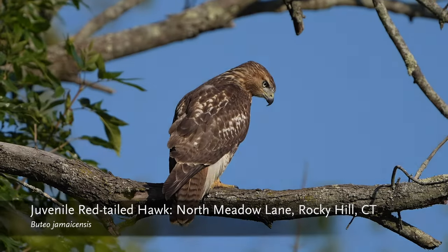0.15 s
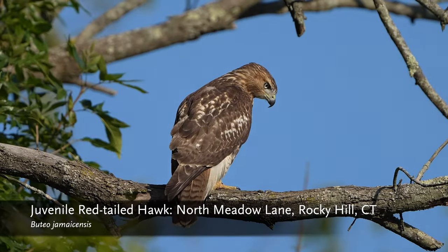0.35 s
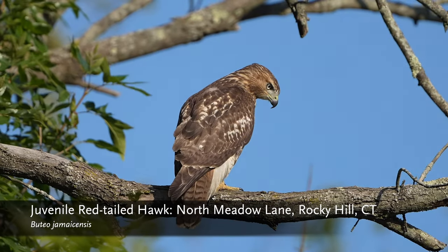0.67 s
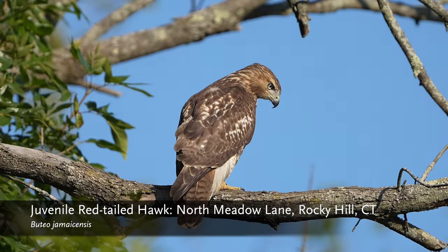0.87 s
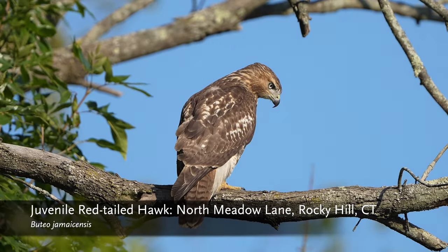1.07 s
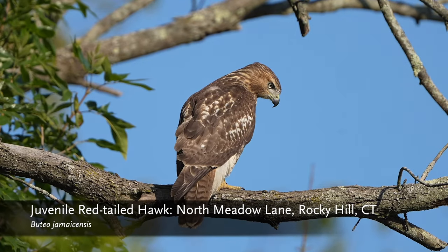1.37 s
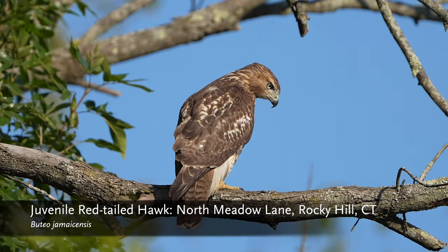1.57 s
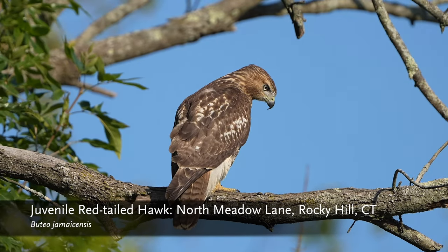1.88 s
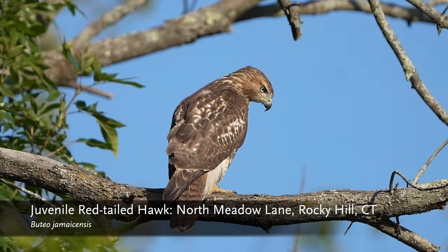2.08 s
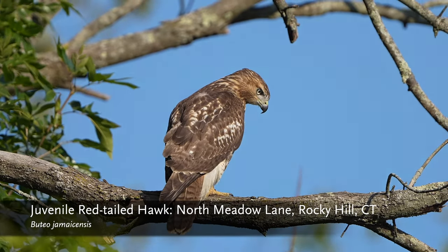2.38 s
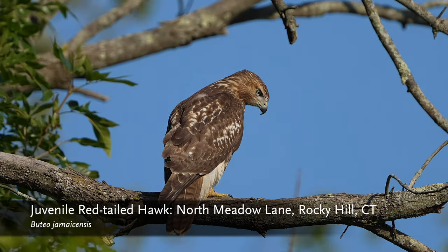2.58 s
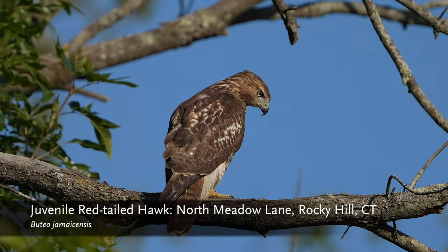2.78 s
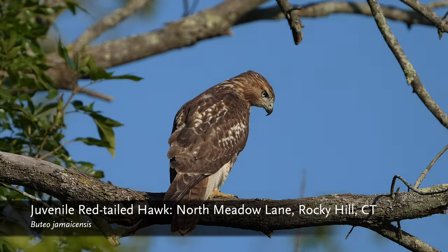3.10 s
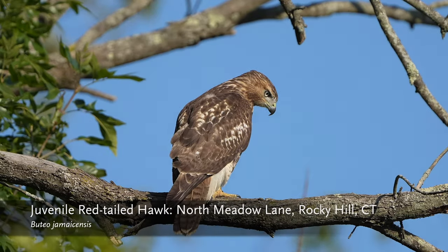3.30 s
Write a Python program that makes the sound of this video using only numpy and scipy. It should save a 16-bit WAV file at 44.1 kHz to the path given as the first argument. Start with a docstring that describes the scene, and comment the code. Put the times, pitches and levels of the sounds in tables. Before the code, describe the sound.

A high cricket chorus fades in and keeps swelling and ebbing outdoors over a distant road's hiss and drone. A katydid buzzes until 0.9 seconds and again from 2, while another ticks between 0.5 and 1.8. A far bird whistles faintly around 0.7. Small close clicks come near 1.1, 1.4 and 3.3 seconds. Wind rumbles on the microphone, strongest around 0.4, then easing.

```python
"""A meadow edge on a summer day, fading in. A chorus of crickets swells and ebbs over a fainter, lower one;
each wing stroke is a short tone that sags in pitch. One katydid buzzes and another ticks, both as bands
of noise. A far bird whistles, a few small clicks sound close by, a distant road hisses and drones, and
gusts of wind rumble on a stereo microphone."""
import sys
import numpy as np
from scipy import signal
from scipy.fft import rfft, irfft
from scipy.io import wavfile
from scipy.ndimage import uniform_filter1d

SR = 44100
rng = np.random.default_rng(int(sys.argv[2]) if len(sys.argv) > 2 else 0)


def to_wav(s):
    """Save 16-bit WAV."""
    ch = np.atleast_2d(s).T  # columns
    pcm = np.round(np.clip(ch, -1, 1) * 32767)  # PCM
    wavfile.write(sys.argv[1], SR, pcm.astype(np.int16))


N = 152145
TIME, FREQS = np.arange(N) / SR, np.fft.rfftfreq(N, 1 / SR)


def undb(db):
    """Amplitude ratio of a level in decibels."""
    return 10 ** (np.asarray(db) / 20)


def curve(table):
    """Linear interpolation of a table over time."""
    return np.interp(TIME, *np.array(table).T)


def by_hz(table, col):
    """Interpolation of one column over log frequency."""
    rows = np.array(table)
    return np.interp(np.log(FREQS + 1), np.log(rows[:, 0]), rows[:, col])


def unit(x):
    """Normalisation to unit RMS."""
    return x / np.sqrt(np.mean(x ** 2))


def pan(db):
    """Level difference: gains that put the left channel db above the right."""
    return undb(np.array([[.5], [-.5]]) * db)


def wander(rate_hz):
    """Random modulation: sample-and-hold noise, smoothed twice."""
    hold = int(SR / rate_hz)
    held = rng.standard_normal(400)[np.arange(N) // hold % 400]
    return 1.5 * uniform_filter1d(uniform_filter1d(held, hold), hold)


# Likeness of the two channels: (frequency [Hz], coherence [0-1], phase lead of the right [rad])
COHERENCE = [(30, 0.93, 0.93), (70, 0.9, -.5), (144, 0.84, -0.5), (298, 0.6, -0.55), (590, 0.24, -0.26),
             (1080, 0.87, -0.55), (1890, 0.1, 0.37), (3530, 0.85, -2.08), (5700, 0.85, -1.39),
             (9100, 0.86, -1.4), (13000, 0.54, -2.1)]
def stereo(left, unrelated):
    """Partial coherence: the right channel mixes the phase-shifted left with an unrelated signal."""
    coherence = np.clip(by_hz(COHERENCE, 1), 0, 1)
    shared = coherence * np.exp(1j * by_hz(COHERENCE, 2)) * rfft(left)
    right = irfft(shared + np.sqrt(1 - coherence ** 2) * rfft(unrelated), N)
    return np.array([left, right])


def filtered_noise(gain):
    """Spectral shaping: stereo white noise weighted by a gain at each frequency."""
    white = stereo(*rng.standard_normal((2, N)))
    return unit(irfft(rfft(white) * gain, N))


def hiss(spectrum):
    """Band-limited noise with a tabulated spectrum."""
    in_band = (FREQS > spectrum[0][0]) * (FREQS < 1.03 * spectrum[-1][0])
    return filtered_noise(undb(by_hz(spectrum, 1)) * in_band)


def hum(peaks):
    """Resonance: noise confined to narrow Lorentzian peaks is heard as blurred notes."""
    return filtered_noise(sum(undb(db) / (1 + (2 * (FREQS - hz) / width) ** 2) for hz, width, db in peaks))


# Road hiss with leaves, and traffic roar: (frequency [Hz], spectral level [dB])
HISS_SPECTRUM = [(450, -30), (620, -10.5), (800, -4.5), (1100, -1), (1350, -5.5), (1800, -10), (2500, -7.5),
                 (3400, -11.5), (4500, -9.5), (5500, -8), (7300, -13), (8700, -13), (10000, -12),
                 (14000, -8.5), (16000, -39)]
ROAR_SPECTRUM = [(150, -6), (220, -4), (300, -1.5), (400, -9), (520, -9), (700, -10), (850, -37)]
# Notes of tyres and motor: (frequency [Hz], bandwidth [Hz], level [dB])
TYRE_PEAKS = [(1064, 12, -4), (1172, 9, 0)]
MOTOR_PEAKS = [(48.9, 6.3, 0), (100.6, 9.8, -0.5), (154.3, 4.9, -12.5), (187.7, 12, -15.5),
               (253.4, 9.4, -16.5), (301, 7.3, -20.5)]
# Envelopes of the road's four sounds: (time [s], level [dB])
WHINE_LEVEL = [(0, -100), (.4, -68), (1.4, -68), (1.55, -59), (1.75, -63), (1.95, -57), (2.15, -59),
               (2.35, -67), (2.6, -64), (3.45, -68)]
HISS_LEVEL = [(0, -94), (.11, -82.5), (.21, -66), (.3, -49.5), (.4, -43.5), (.58, -45.5), (1.3, -45),
              (2.03, -46), (2.82, -45), (3.12, -46), (3.45, -49)]
ROAR_LEVEL = [(0, -101), (.13, -86), (.26, -63), (.37, -51), (.5, -58), (1.2, -52), (1.6, -54.5),
              (2.15, -51), (2.6, -56), (3.0, -57), (3.25, -63), (3.45, -60)]
MOTOR_LEVEL = [(0, -76), (.12, -51), (.3, -33.5), (.43, -34), (.7, -35), (1.09, -39), (1.6, -38),
               (2.39, -36), (2.9, -45), (3.3, -54), (3.45, -52)]
def road():
    """Incoherent sources add: a thin whine, hiss with singing tyres, a low roar and a motor's drone."""
    whine_hz = 1068 + 3 * wander(3.6)
    whine = np.sin(2 * np.pi * np.cumsum(whine_hz) / SR) * undb(curve(WHINE_LEVEL))
    tyres = hiss(HISS_SPECTRUM) + undb(-14 + wander(4.6)) * hum(TYRE_PEAKS)
    roar = hiss(ROAR_SPECTRUM) * undb(curve(ROAR_LEVEL) + 2 * wander(14))
    tyres *= undb(curve(HISS_LEVEL) + wander(9)) * pan(1.5)
    motor = hum(MOTOR_PEAKS) * undb(curve(MOTOR_LEVEL))
    return whine + tyres + roar + motor


# Wind rumble, and the flutter on the strongest gusts: (frequency [Hz], spectral level [dB])
RUMBLE_SPECTRUM = [(20, -1.5), (30, -8), (43, 2), (59, -2), (80, -3), (120, -7), (160, -27.5), (217, -18.5),
                   (300, -37.5), (400, -50)]
FLUTTER_SPECTRUM = [(85, -33), (115, 4), (150, 0.5), (190, -7.5), (260, -21), (420, -24)]
# Their envelopes: (time [s], level [dB])
RUMBLE_LEVEL = [(0, -70), (.13, -46), (.3, -31), (.42, -28), (.6, -31), (.9, -32), (1.15, -36), (1.37, -32),
                (1.5, -37), (1.9, -38), (2.2, -38), (2.5, -40), (2.85, -42), (3.0, -46), (3.15, -47),
                (3.25, -55), (3.45, -48)]
FLUTTER_LEVEL = [(0.0, -78.5), (0.21, -40), (0.27, -47), (0.35, -27), (0.6, -43), (1.75, -49.5),
                 (1.79, -35.5), (1.84, -50), (2.16, -41), (2.21, -47), (2.27, -37), (2.35, -61),
                 (2.55, -47), (2.57, -42.5), (3.22, -65.5), (3.45, -51)]
# Single shoves of air: (time [s], peak level [dB], width [s], polarity [+1 or -1])
BUFFETS = [(.354, -18, .004, -1), (.365, -17, .003, 1), (.388, -17, .004, -1), (.425, -20, .004, 1),
           (.704, -22, .006, -1), (1.35, -24, .007, 1), (1.794, -20, .006, -1), (1.853, -27, .002, 1),
           (2.032, -19.5, .006, 1), (2.149, -25, .0016, -1), (2.266, -24, .003, 1), (2.286, -22, .004, 1),
           (2.487, -25, .005, -1)]
def wind():
    """Pressure fluctuation at the microphone: gusty low noise, and single pulses that swing back."""
    out = hiss(RUMBLE_SPECTRUM) * undb(curve(RUMBLE_LEVEL) + 1.8 * wander(23.93))
    out += hiss(FLUTTER_SPECTRUM) * undb(curve(FLUTTER_LEVEL))
    for at, db, width, polarity in BUFFETS:
        u = (TIME - at) / width
        out += polarity * undb(db) * (1 - u ** 2) * np.exp(-u ** 2)
    return out


# Close snaps: (time [s], peak level [dB], frequency [Hz], length [cycles], left minus right [dB])
CLICKS = [(1.0763, -30, 2800, 1.8, 4), (1.0767, -37, 1200, 1.2, 4), (1.358, -38, 1400, 1.8, 0),
          (3.297, -28.5, 1100, 1.7, 0)]
def clicks():
    """Time-bandwidth trade-off: a tone only a cycle or two long is heard as a dry snap."""
    out = np.zeros((2, N))
    for at, db, hz, length, pan_db in CLICKS:
        cycles = (TIME - at) * hz
        window = np.exp(-(2 * cycles / length) ** 2)
        out -= window * np.cos(2 * np.pi * cycles) * undb(db) * pan(pan_db)
    return out


# Notes: (time [s], length [s], start pitch [Hz], middle pitch [Hz], end pitch [Hz], level [dB], fade [dB])
BIRD_NOTES = [(0.589, 0.074, 2500, 2655, 2470, -42, 3), (.731, 0.062, 2450, 2100, 1870, -44, 11),
              (0.75, .12, 2630, 2690, 2700, -55.5, 1)]
BIRD_BENDS = (6, 2, 2)  # a higher exponent holds the middle pitch longer
def bird(waver_hz=22, waver_db=3, edge_s=.017):
    """Frequency modulation: each thin whistle is a wavering sine that glides through three pitches."""
    out = np.zeros(N)
    for (at, length, start, middle, end, db, fade_db), bend in zip(BIRD_NOTES, BIRD_BENDS):
        progress = np.clip((TIME - at) / length, 0, 1)
        centred = 2 * progress - 1
        slope = (end - start) / 2 * centred ** (bend - 1)
        arch = ((start + end) / 2 - middle) * centred ** bend
        pitch = middle + slope + arch + waver_hz * wander(90.5)
        gate = np.clip(np.minimum(TIME - at, at + length - TIME) / edge_s, 0, 1)
        envelope = gate * undb(db - fade_db * progress + waver_db * wander(77.4))
        out += envelope * np.sin(2 * np.pi * np.cumsum(pitch) / SR)
    return out * pan(7)


# Rasp of a tick: (frequency [Hz], spectral level [dB])
TICK_SPECTRUM = [(7500, -30), (8800, -22), (10300, -6), (11400, -7), (12800, -2.5), (14200, -5),
                 (15300, -1), (15900, -6), (16200, -30)]
# Ticks: (time [s], level [dB], rise [s], left minus right [dB], relative tail level [dB])
TICKS = [(.524, -43, .014, -5, -1), (.612, -41, 0.02, -3, -1), (.7, -39.5, 0.011, -8, -2),
         (.784, -41, .009, -6, -1), (.941, -37, .002, -7.5, -6), (1.0984, -37, .003, -7.5, -5),
         (1.321, -41.5, .004, -4, -4), (1.4868, -36, .002, -6, -7), (1.713, -51, 0.005, -2.5, -3),
         (1.787, -47.5, 0.006, 3, 0)]
def ticking_katydid(hold_s=.003, fall_s=.003, tail_s=.02):
    """Exponential decay: each burst dies quickly, and scattering in the grass adds a slower tail."""
    rasp, out = hiss(TICK_SPECTRUM), np.zeros((2, N))
    for at, db, rise, pan_db, tail_db in TICKS:
        attack = np.clip((TIME - at) / rise, 0, 1)
        age = np.maximum(TIME - at - rise - hold_s, 0)
        decay = np.exp(-age / fall_s) + undb(tail_db) * np.exp(-age / tail_s)
        out += rasp * attack * decay * undb(db) * pan(pan_db)
    return out


# Rasp of the buzz: (frequency [Hz], spectral level [dB])
BUZZ_SPECTRUM = [(7500, -16), (8700, -20.5), (9660, -3), (10800, -6.5), (12100, 1), (13200, 3),
                 (14300, 5.5), (15000, -1.5), (15800, -4), (16100, -32)]
# Its envelope: (time [s], level [dB])
BUZZ_LEVEL = [(0, -91), (.11, -74), (.26, -51.5), (.36, -43.5), (.55, -42.5), (.75, -44), (.88, -42.5),
              (.96, -53), (1.5, -55), (1.8, -51.5), (2.0, -45), (2.25, -42), (2.9, -43), (3.2, -42),
              (3.45, -45)]
# Delay of each wing stroke's loudest moment: (time [s], lag [strokes])
STROKE_LAG = [(0, .41), (.45, 0.57), (.8, 0.66), (2.1, 1), (2.4, 0.2), (2.75, 0.49), (3.45, 0.43)]
def buzzing_katydid(stroke_hz=41, depth=.27):
    """Amplitude modulation: a high rasp throbs with each wing stroke."""
    throb = 1 + depth * np.cos(2 * np.pi * (stroke_hz * TIME - curve(STROKE_LAG)))
    return hiss(BUZZ_SPECTRUM) * throb * undb(curve(BUZZ_LEVEL) + wander(9.62)) * pan(1.5)


def crickets(carrier_hz, spread_hz, stroke_hz, flat_stretch, count, duty=.7, sag_hz=147.3, scatter_db=4.5):
    """Stridulation: each cricket has its own pitch and pace, and each wing stroke is a tone that sags."""
    step = 16  # offsets from the carrier are slow enough for a lower sample rate
    t = np.arange(N // step + 1) * step / SR
    groups = np.zeros((2, len(t)), complex)
    for k, (detune, pace, loudness, start) in enumerate(rng.standard_normal((count, 4))):
        strokes = stroke_hz * (1 + .08 * pace) * t + abs(start)
        progress = np.minimum(strokes % 1 / duty, 1)
        offset_hz = spread_hz * (detune + .5 * rng.standard_normal(300)[strokes.astype(int)])
        offset_hz[offset_hz < 0] *= flat_stretch  # skews the spread below the carrier
        offset_hz += sag_hz * (.5 - progress)
        tone = np.exp(2j * np.pi * np.cumsum(offset_hz) * step / SR)
        groups[k % 2] += undb(scatter_db * loudness) * np.sin(np.pi * progress) * tone
    baseband = signal.resample(groups, len(t) * step, axis=1)[:, :N]
    song = (baseband * np.exp(2j * np.pi * carrier_hz * TIME)).real
    return stereo(unit(song[0]), unit(song[1])) * pan(.53)


# Envelope of the lower chorus: (time [s], level [dB])
LOW_CHORUS_LEVEL = [(0, -100), (.11, -85.5), (.29, -58.5), (.36, -56), (.84, -53), (1.46, -56), (1.91, -54),
                    (2.55, -54.5), (3.2, -54.5), (3.45, -53)]
def low_chorus():
    """Superposition: faint, lower-pitched crickets merge into one band of sound."""
    song = crickets(carrier_hz=3860, spread_hz=130, stroke_hz=42, flat_stretch=.6, count=40)
    return song * undb(curve(LOW_CHORUS_LEVEL))


# Crickets too far to tell apart: (frequency [Hz], spectral level [dB])
BLUR_SPECTRUM = [(5500, -36), (5800, -25), (6100, -11.5), (6220, -7), (6280, 5), (6340, -4),
                 (6440, 1), (6505, 2), (6570, 1.5), (6750, -7), (6900, -18), (7200, -27)]
# Swells of the main chorus: (time [s], level [dB])
MAIN_CHORUS_LEVEL = [(0.0, -91), (0.1, -64), (0.29, -45.5), (0.31, -41), (0.34, -44.5), (0.35, -38),
                     (0.43, -41.5), (0.45, -37.5), (0.52, -44.5), (0.7, -38.5), (0.87, -44.5),
                     (1.03, -37.5), (1.08, -42.5), (1.2, -44), (1.21, -41), (1.3, -38.5), (1.47, -43),
                     (1.63, -38), (1.82, -42.5), (1.92, -38.5), (2.4, -41.5), (2.49, -39), (2.68, -42.5),
                     (2.78, -39.5), (3.0, -43), (3.19, -38), (3.29, -44), (3.45, -40.5)]
def main_chorus():
    """Random-phase summation: far crickets blur into narrow-band noise that swells with the near ones."""
    near = crickets(carrier_hz=6394, spread_hz=135, stroke_hz=32, flat_stretch=1.55, count=120)
    far = undb(-2) * hiss(BLUR_SPECTRUM)
    return (near + far) * undb(curve(MAIN_CHORUS_LEVEL))


def scene():
    """Linear superposition: the pressures of all sources add."""
    choruses = low_chorus() + main_chorus()
    return choruses + road() + buzzing_katydid() + ticking_katydid() + bird() + clicks() + wind()


def record(dry, cutoff_hz=16300):
    """Band limiting: a steep elliptic low-pass removes the highest treble."""
    return signal.sosfilt(signal.ellip(10, .2, 80, cutoff_hz, fs=SR, output="sos"), dry)


dry = scene()
out = record(dry)
to_wav(out)
```